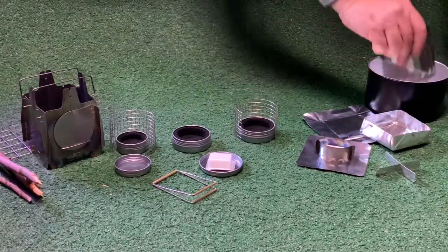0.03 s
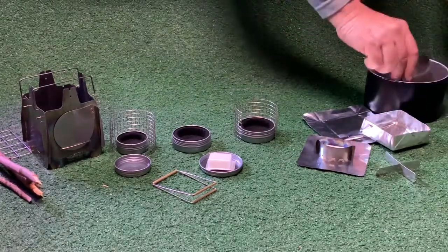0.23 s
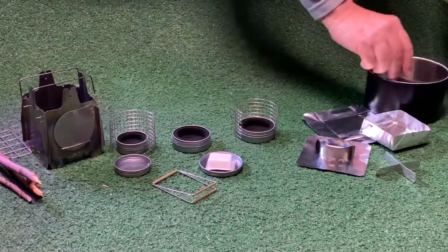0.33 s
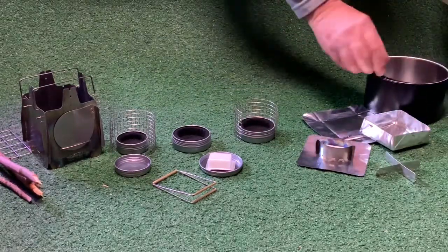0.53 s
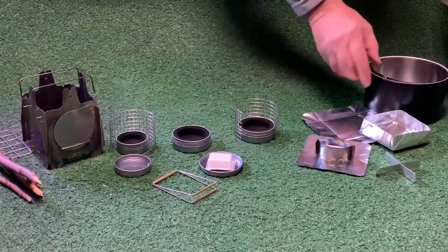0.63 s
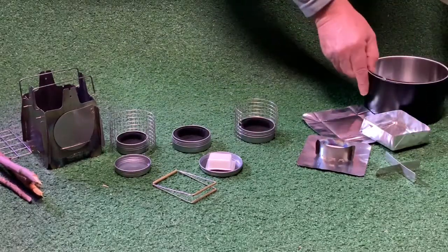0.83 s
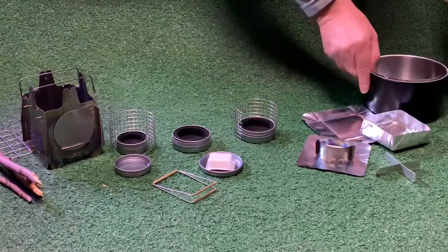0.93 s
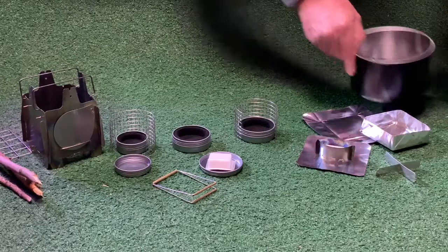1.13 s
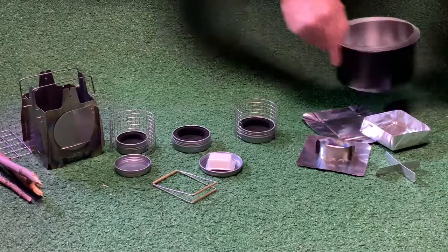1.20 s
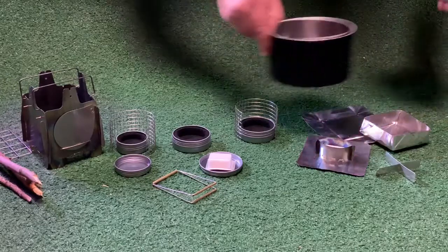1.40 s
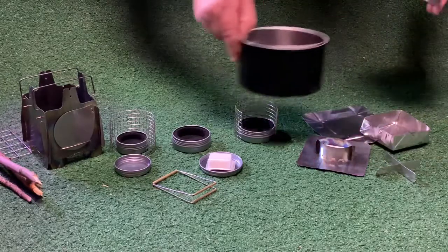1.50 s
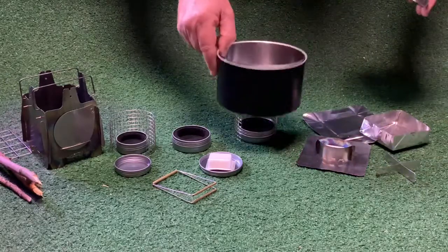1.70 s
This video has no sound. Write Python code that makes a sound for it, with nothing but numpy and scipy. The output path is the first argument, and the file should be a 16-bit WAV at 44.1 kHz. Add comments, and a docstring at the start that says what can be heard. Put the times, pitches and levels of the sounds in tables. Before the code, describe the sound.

Thin metal panels drop into a small cooking pot with a ringing knock, slide, clatter and settle with a bright click. A hand takes the pot with a soft tap and light rubbing in a faintly rumbling room.

```python
"""Thin metal windscreen panels are dropped into a small cooking pot in a faintly rumbling room.
After a light rub they knock on the bottom at 0.2 s, shaking the sheet and ringing the pot.
They slide down the wall, fall over with a clatter and settle with a bright click at 0.46 s.
At 0.75 s a hand takes the pot with a soft tap and lifts it, fingers and panels rubbing lightly."""
import sys
import numpy as np
from scipy import signal
from scipy.fft import rfft, irfft
from scipy.io import wavfile
from scipy.ndimage import uniform_filter1d

SR = 44100
rng = np.random.default_rng(int(sys.argv[2]) if len(sys.argv) > 2 else 0)


def log_audio(samples):
    """Write samples as a 16-bit WAV file to the path given in sys.argv[1]."""
    # one column per channel
    frames = np.atleast_2d(samples).T
    # limit to full scale, then quantise
    limited = np.clip(frames, -1, 1)
    pcm = np.round(limited * 32767).astype(np.int16)
    wavfile.write(sys.argv[1], SR, pcm)


N = 77175  # 1.75 s

# room rumble spectrum: freq_hz, density_db
RUMBLE_SPECTRUM = [(15, -30), (25, -13), (43, -2.5), (117, -4), (180, -15.5), (326, -19), (545, -23.5),
                   (840, -26), (1300, -32.5), (2000, -34.5), (4000, -43), (7000, -52), (9500, -67),
                   (16000, -66.5)]
# hum lines: pitch_hz, level_db, width_hz
HUM_LINES = [(75, -58.5, 8), (110.5, -52.5, 7.9), (203.4, -63.5, 5.4), (408, -71, 2), (546, -70, 3)]
# room decay: freq_hz, t60_s
ROOM_DECAY = [(200, 0.16), (1000, .33), (4000, 0.22), (8000, 0.23), (14000, .21)]
# reflections in the pot and off the floor: delay_s, gain_db
CLOSE_ECHOES = [(.0019, -15), (.0043, -14), (.0066, -19.5), (0.0094, -21)]
# fingers and panels rubbing: time_s, level_db
RUB_ENVELOPE = [(0, -55.5), (.12, -61.5), (.19, -52), (.3, -82), (.73, -80.5), (.78, -49.5), (.86, -55.5),
                (.98, -52.5), (1.02, -69), (1.36, -77.5), (1.48, -58), (1.54, -65.5), (1.59, -59.5),
                (1.64, -67), (1.685, -53), (1.72, -70), (1.75, -69.5)]
# rub spectrum: freq_hz, gain_db
RUB_SPECTRUM = [(200, -6.5), (1500, -3), (3000, -6.5), (6000, -7), (8500, -18.5), (12000, -25.5),
                (15000, -16)]
# edges sliding on the wall: time_s, level_db
SLIDE_ENVELOPE = [(.22, -53), (.262, -24), (.29, -24.5), (.315, -23), (.335, -17), (.4, -25), (.43, -67)]
# slide spectrum: freq_hz, gain_db
SLIDE_SPECTRUM = [(200, -13.5), (900, -8), (2000, -13), (5500, -7), (8500, -15), (11000, -25),
                  (14500, -13.5)]
# an edge or wall springing free: start_s, pitch_hz, level_db, t60_s, sag_hz_per_s
EDGE_TWANGS = [ (.205, 548, -22, 0.12, 1000), (0.2414, 997, -30, .06, -0.5), (.2805, 996, -30.5, .08, -1),
               (.3323, 4400, -5.5, .007, 0), (.4598, 4900, -31, .06, 0), (.463, 660, -41, .12, 600),
               (.7465, 944, -44.5, .08, 0), (.945, 3025, -60.5, 0.13, -0.5)]
# pot with panels standing in it: pitch_hz, level_db, t60_s
POT_MODES = [(263, -16.5, 0.11), (528, -10, 0.13), (948, -15.5, .2), (1006, -2.5, 0.073),
             (1120, -12.5, .08), (1209, -13, 0.18), (1476.6, 3, 0.14), (1525, 6, 0.046), (1592, -12, 0.19),
             (2361, -14, .18), (3064, -11.5, 0.095), (3863, -15.5, 0.28), (3951, -18.5, .22),
             (6670, -19.5, 0.16), (7525, -17, .11)]
# panels loose against the wall: pitch_hz, level_db, t60_s
PANEL_MODES = [(980, -8, .34), (1489, -11, .26), (1600, -13, .2), (2063, 0, .27), (2217, -4, .25),
               (2250, -11, .25), (2445, -12, .25), (2481, -11, .25), (2698, -14, .25), (2955, -4, .16),
               (2979, 0, .19), (3460, -13, .18), (3777, -8, .22), (3885, -12, .22), (3955, -12, .22),
               (6746, -16, .18)]
# crowded modes of thin sheet: freq_hz, gain_db
SHEET_SPECTRUM = [(140, -38.5), (280, -10.5), (440, -15), (560, -1), (720, -3.5), (850, -5.5), (980, 4),
                  (1170, -11), (1530, 5.5), (1850, -3), (2100, -1), (3200, -3), (4100, -5.5), (6800, -9),
                  (10500, -21.5), (14500, -18.5)]
# sheet decay: freq_hz, t60_s
SHEET_DECAY = [(300, 0.039), (1500, 0.062), (4000, 0.099), (14000, .07)]
# bands of a contact's spectrum: freq_hz
CONTACT_BANDS_HZ = [500, 1400, 2800, 5000, 12000]
# knocks and taps: start_s, rise_s, band_db (one per contact band), pot_db, panel_db
CONTACT_EVENTS = [ (.198, 0.001, -50.5, -62, -9.5, -23, -24, -29.5, -77),
                  (0.2031, 0.00028, -3.5, -9, -11, -8, -6, -16, -44),
                  (0.2435, 0.0026, -35.5, -32, -23, -18, -25, -34.5, -53.5),
                  (0.28, 0.0018, -27.5, -24.5, -40.5, -37, -14, -36.5, -67),
                  (0.3258, 0.0025, -5.5, -3, -42, -3.5, -19, -46, -48.5),
                  (0.3323, 0.00015, -14, -16.5, -5.5, -5, -19.5, -44, -63),
                  (0.338, 0.0012, -13.5, -9.5, -3, -4, -5.5, -40, -18.5),
                  (.3612, 0.0036, -15.5, -1.5, -12.5, -8.5, -8.5, -28, -30.5),
                  (.381, 0.0029, -26, -23.5, -19, -9.5, -18, -49, -29.5),
                  (0.4595, 0.00024, -29, -28.5, -23.5, -11.5, -8.5, -53, -47.5),
                  (.477, 0.0074, -22, -30, -21, -25.5, -27, -66, -52),
                  (.7455, 0.0046, -24.5, -34, -31, -36, -37.5, -52, -66),
                  (0.77, 0.0055, -27.5, -49, -49.5, -50, -36, -71, -72),
                  (0.831, .005, -55, -47, -40, -44, -46, -64, -72),
                  (.9, 0.0046, -51, -44, -50, -44, -42, -67.5, -67),
                  (.943, 0.0053, -54, -49, -54.5, -63, -65.5, -71.5, -67.5)]

RUMBLE_DB = -49
ROOM_SEND_DB, ROOM_RING_SEND_DB, ROOM_GAP_S = -10.5, -15.5, 0.0057
SLIPS_PER_S, SLIP_SPREAD_DB = 4000, 1
CRACK_DB, CRACK_DECAY_S = -4.5, 0.0008
MUTE_START_S, MUTE_DB_PER_S = 0.37, 105
CUTOFF_HZ = 15800


def amp(db):
    """Decibels to gain."""
    return 10 ** (np.asarray(db) / 20)


def unit_rms(x):
    """Scale to an rms of one."""
    return x / np.sqrt(np.mean(x ** 2) + 1e-20)


def log_interp(points, hz):
    """Interpolate a table on a log-frequency axis."""
    points_hz, values = np.transpose(points)
    return np.interp(np.log(hz + 1), np.log(points_hz + 1), values)


def add(mix, start_s, sound):
    """Mix a sound in at start_s."""
    part = mix[max(round(start_s * SR), 0):][:len(sound)]
    part += sound[:len(part)]


def colour(x, *spectra, size=4096):
    """Minimum-phase filter from the sum of the dB spectra."""
    hz = abs(np.fft.fftfreq(size, 1 / SR))
    log_gain = np.log(amp(sum(log_interp(points, hz) for points in spectra)))
    response = np.exp(np.conj(signal.hilbert(log_gain)))
    taps = np.fft.ifft(response).real[:size // 2]
    return signal.fftconvolve(x, taps)[:len(x)]


def dense_ring(decay, length, size=128, smooth_hz=69.6):
    """Crowded random modes sharing energy evenly; each band dies at its own rate."""
    hz, t, bands = signal.stft(rng.choice([-1., 1.], length), SR, nperseg=size)
    t60_s = log_interp(decay, hz)[:, None]
    ringing = signal.istft(bands * amp(-60 * t / t60_s), SR, nperseg=size)[1][:length]
    spectrum = rfft(ringing, 2 * length)
    power = uniform_filter1d(abs(spectrum) ** 2, round(2 * length * smooth_hz / SR))
    flatten = np.sqrt(power.mean() / (abs(power) + 1e-12))
    return irfft(spectrum * flatten)[:length]


def shaped_noise(gain):
    """Unit-rms noise, one gain per frequency bin."""
    return unit_rms(irfft(rfft(rng.standard_normal(N)) * gain, N))


def background():
    """Low room rumble and wavering hum lines."""
    hz = np.fft.rfftfreq(N, 1 / SR)
    rumble = amp(RUMBLE_DB) * shaped_noise(amp(log_interp(RUMBLE_SPECTRUM, hz)))
    hum = sum(amp(level_db) * shaped_noise(1 / (1 + ((hz - pitch_hz) / width_hz) ** 2))
              for pitch_hz, level_db, width_hz in HUM_LINES)
    return rumble + hum


def room(x):
    """Diffuse small-room reflections, fading in after a short gap."""
    t = np.arange(SR // 2) / SR
    tail = dense_ring(ROOM_DECAY, len(t)) * np.clip(t / ROOM_GAP_S - 1, 0, 1)
    return signal.fftconvolve(x, tail / np.linalg.norm(tail))[:N]


def with_echoes(x):
    """Direct sound plus pot and floor reflections, at about equal total power."""
    out = x.copy()
    for delay_s, gain_db in CLOSE_ECHOES:
        add(out, delay_s, amp(gain_db) * x)
    return out / np.sqrt(1 + sum(amp(gain_db) ** 2 for _, gain_db in CLOSE_ECHOES))


def friction(envelope, spectrum):
    """Many tiny slips of uneven size under a level curve."""
    slips = (rng.random(N) < SLIPS_PER_S / SR) * rng.choice([-1, 1], N)
    sizes = amp(SLIP_SPREAD_DB * np.minimum(rng.exponential(1, N), 4))
    level_db = np.interp(np.arange(N) / SR, *np.transpose(envelope))
    return colour(unit_rms(slips * sizes) * amp(level_db), spectrum)


def twangs():
    """One brief mode per freed edge; bent sheet sags in pitch as it relaxes."""
    out, t = np.zeros(N), np.arange(SR // 4) / SR
    for start_s, pitch_hz, level_db, t60_s, sag_hz_per_s in EDGE_TWANGS:
        phase = 2 * np.pi * (pitch_hz - sag_hz_per_s * t / 2) * t
        add(out, start_s, amp(level_db - 60 * t / t60_s) * np.sin(phase))
    return out


def modal_ring(modes, t):
    """Decaying modes of struck metal, alternating in sign."""
    return sum((-1) ** k * amp(level_db - 60 * t / t60_s) * np.sin(2 * np.pi * pitch_hz * t)
               for k, (pitch_hz, level_db, t60_s) in enumerate(modes))


def contacts():
    """Each contact, square or glancing, shakes the sheet and rings pot and panels."""
    clatter, rings = np.zeros(N), np.zeros(N)
    t = np.arange(SR // 2) / SR
    pot, panels = modal_ring(POT_MODES, t), modal_ring(PANEL_MODES, t)
    crack = 1 + amp(CRACK_DB) * np.exp(-t / CRACK_DECAY_S)
    for start_s, rise_s, *bands_db, pot_db, panel_db in CONTACT_EVENTS:
        rise = np.minimum(t / rise_s, 1)
        burst = rise * dense_ring(SHEET_DECAY, len(t)) * crack
        contact_spectrum = list(zip(CONTACT_BANDS_HZ, bands_db))
        add(clatter, start_s, colour(burst, SHEET_SPECTRUM, contact_spectrum))
        add(rings, start_s, rise * (amp(pot_db) * pot + amp(panel_db) * panels))
    return clatter, rings


def scene():
    """Contacts and friction in the room; panels lying together mute the ringing."""
    clatter, rings = contacts()
    muted_s = np.maximum(np.arange(N) / SR - MUTE_START_S, 0)
    rings *= amp(-MUTE_DB_PER_S * muted_s)
    slide = friction(SLIDE_ENVELOPE, SLIDE_SPECTRUM)
    rub = friction(RUB_ENVELOPE, RUB_SPECTRUM)
    metal = with_echoes(clatter) + twangs() + slide + rub
    reverb = room(amp(ROOM_SEND_DB) * metal + amp(ROOM_RING_SEND_DB) * rings)
    return (metal + rings + reverb + background())[None]


def record(dry):
    """Steep low-pass at CUTOFF_HZ."""
    taps = signal.firwin(511, CUTOFF_HZ, window=("kaiser", 9), fs=SR)
    return signal.oaconvolve(dry, taps[None], "same")


dry = scene()
out = record(dry)
log_audio(out)
```